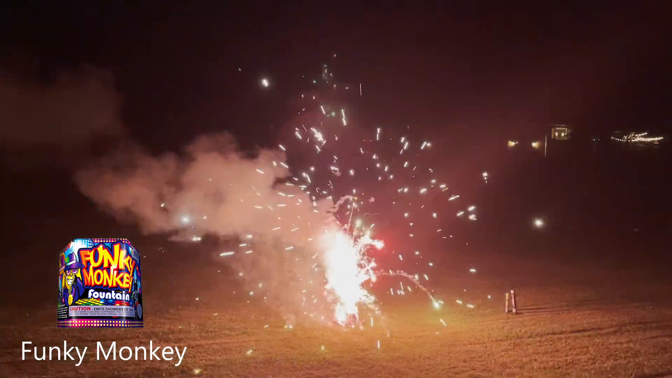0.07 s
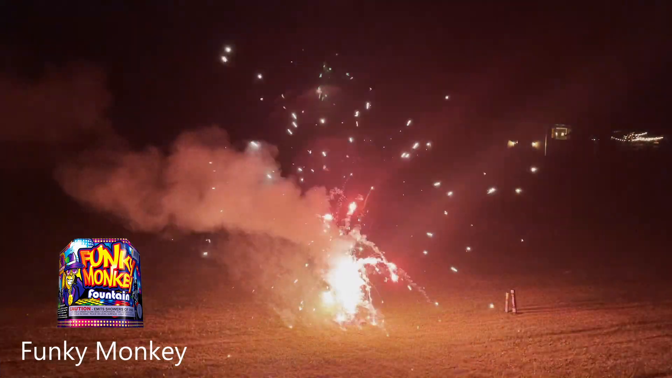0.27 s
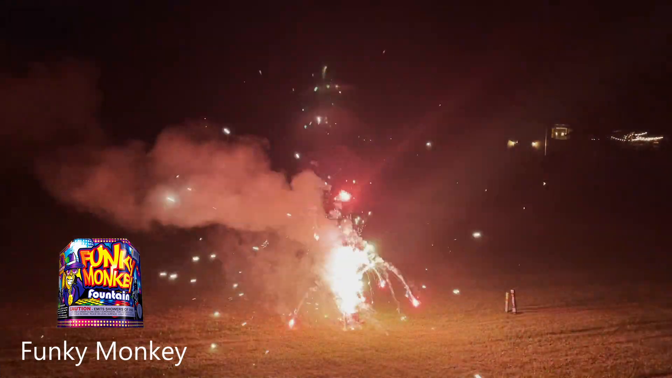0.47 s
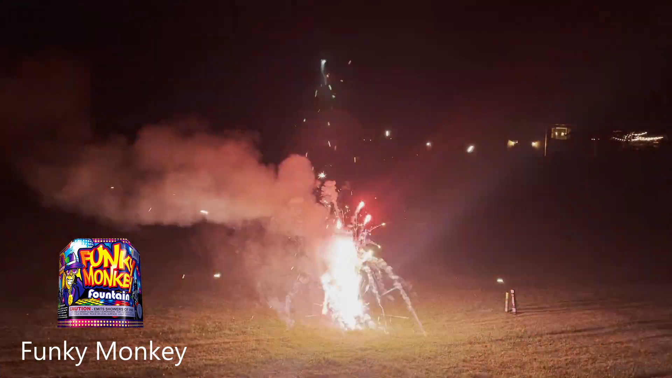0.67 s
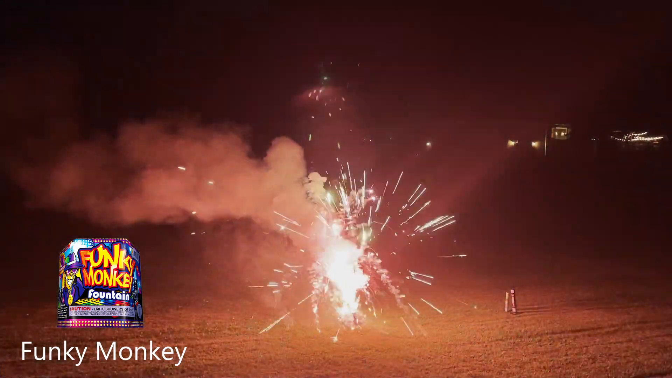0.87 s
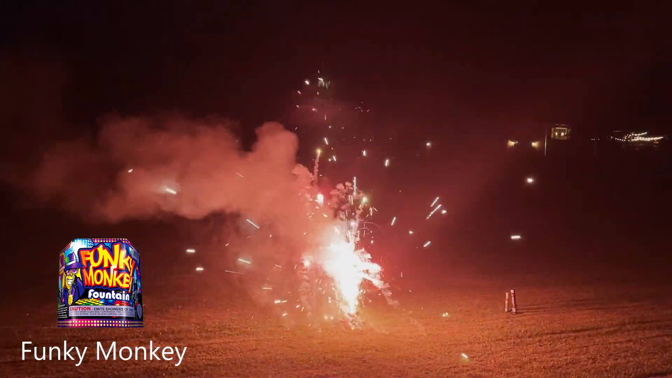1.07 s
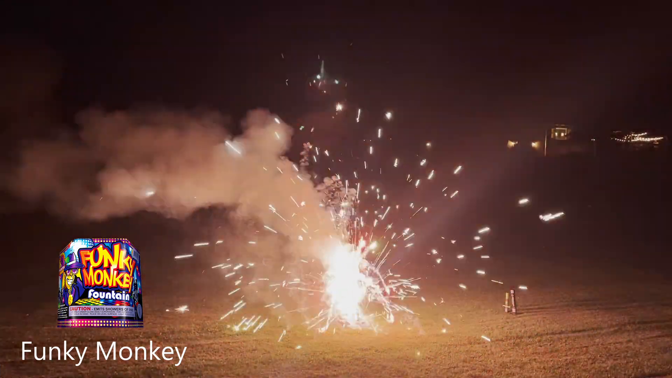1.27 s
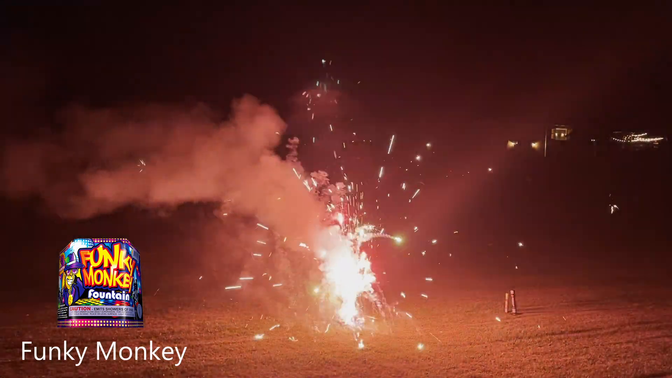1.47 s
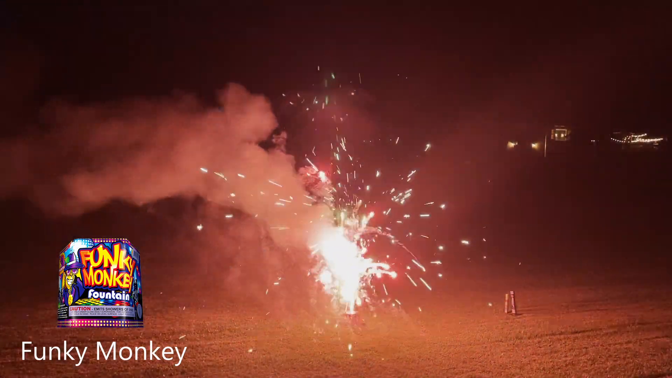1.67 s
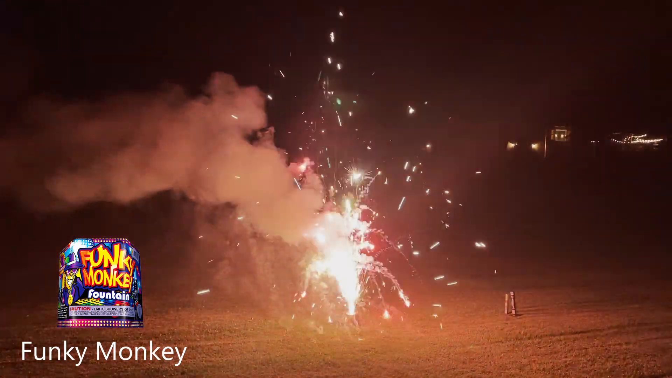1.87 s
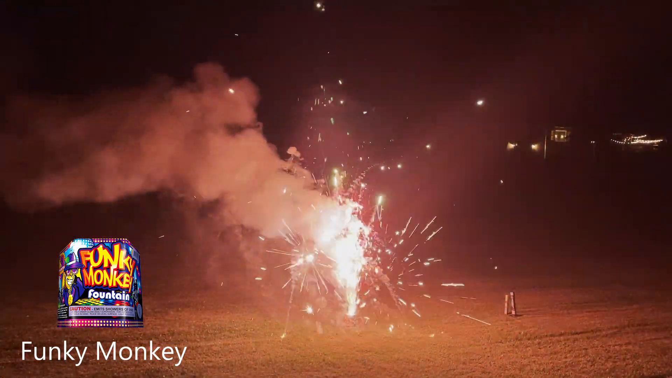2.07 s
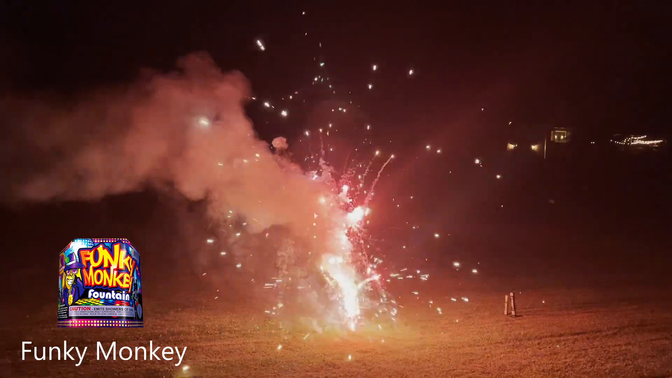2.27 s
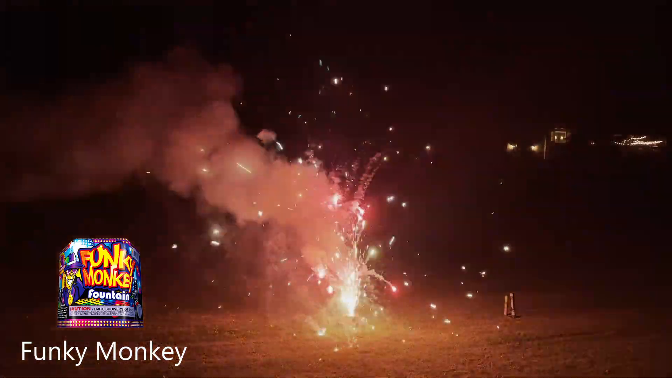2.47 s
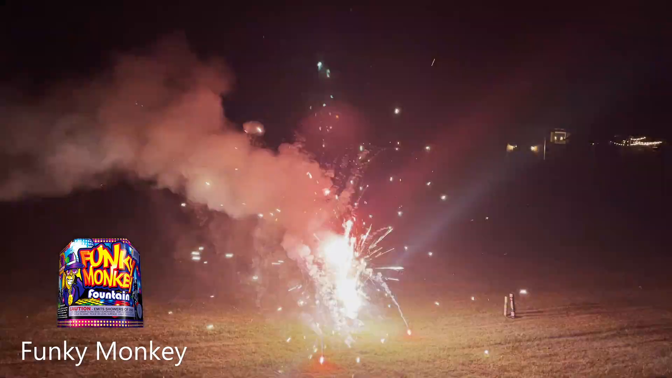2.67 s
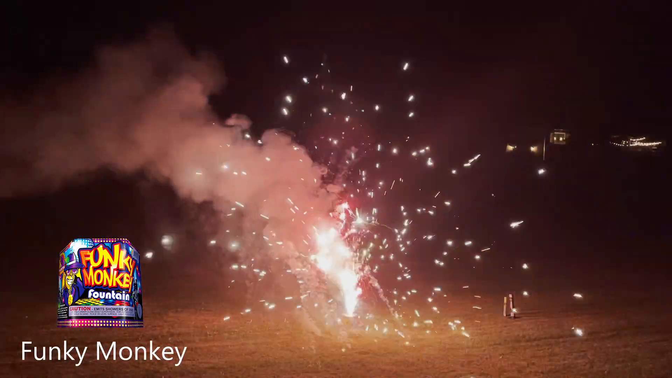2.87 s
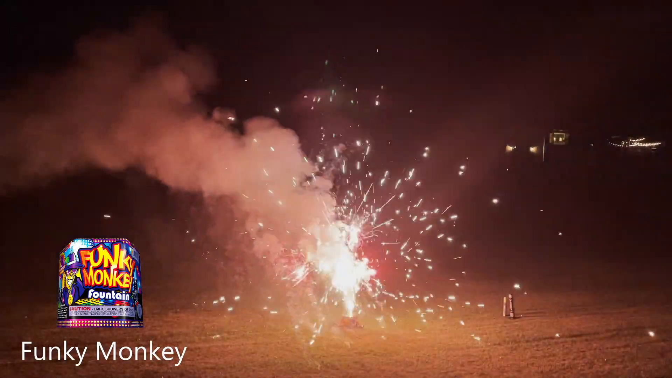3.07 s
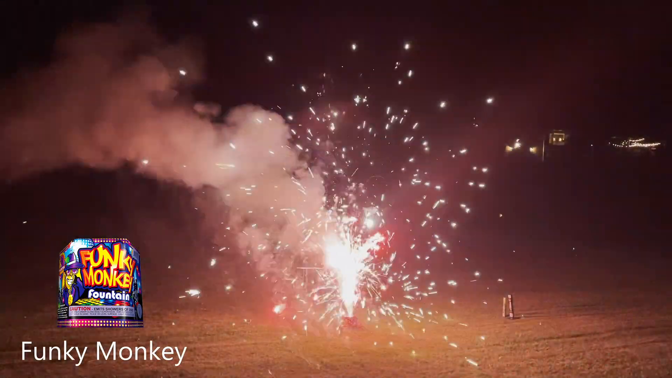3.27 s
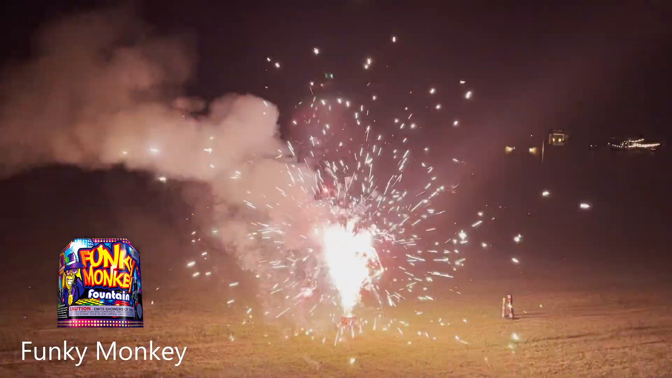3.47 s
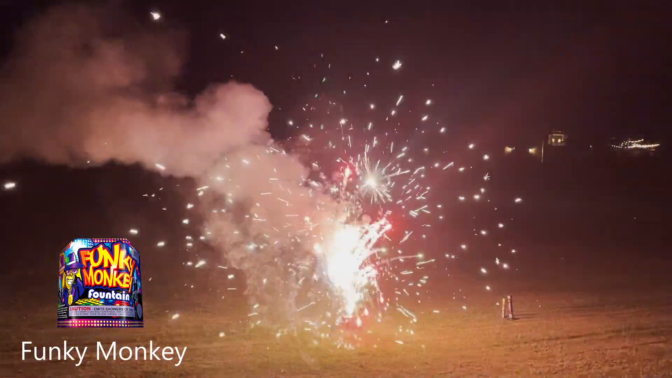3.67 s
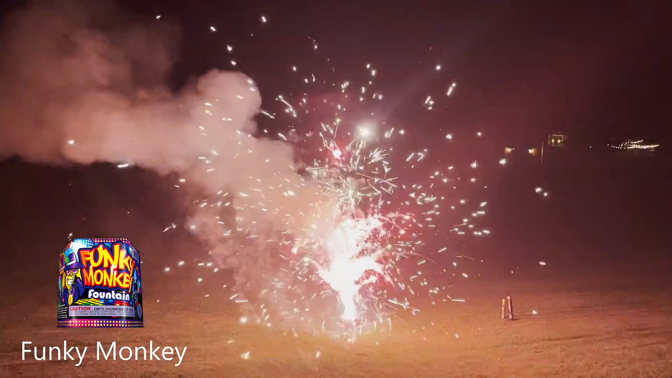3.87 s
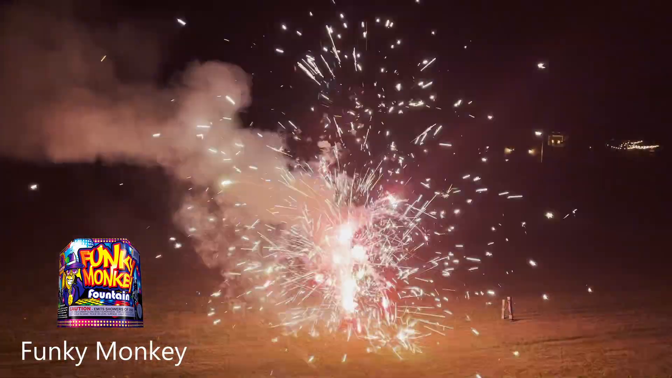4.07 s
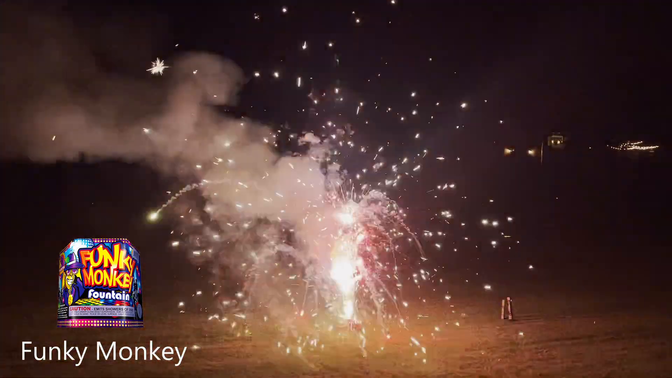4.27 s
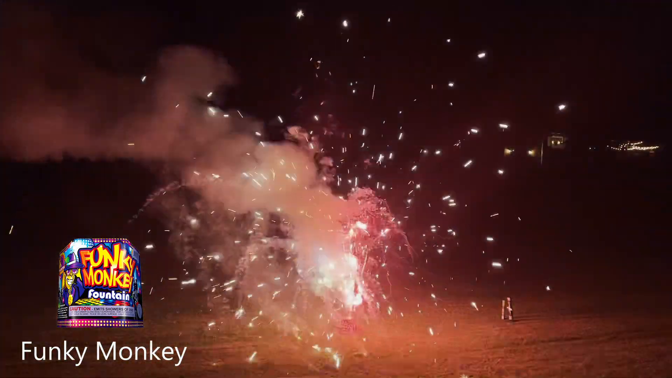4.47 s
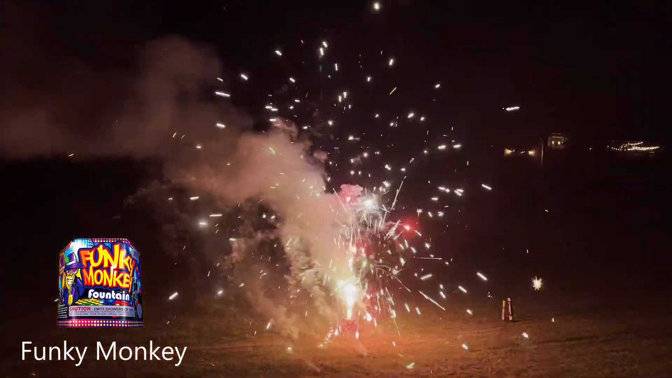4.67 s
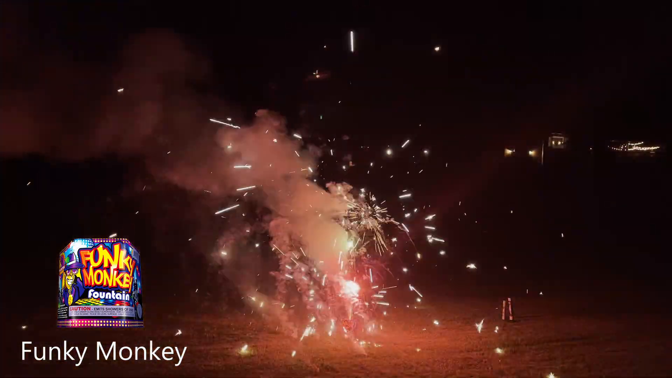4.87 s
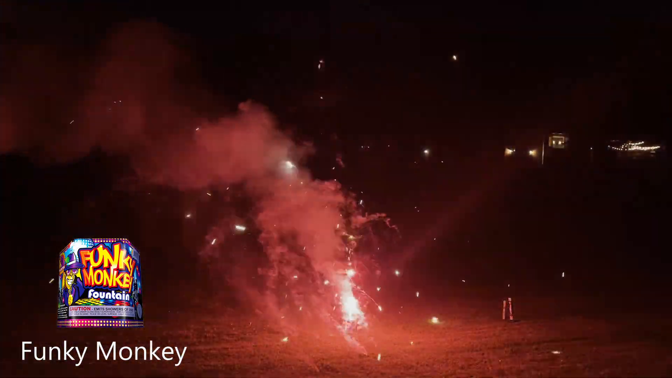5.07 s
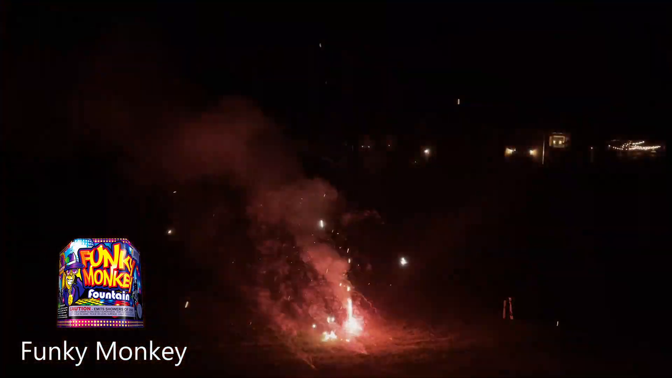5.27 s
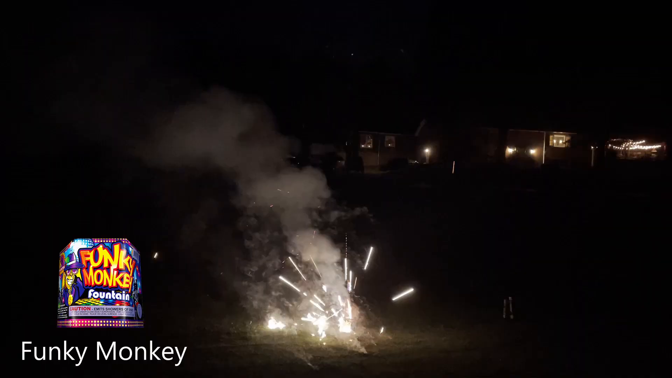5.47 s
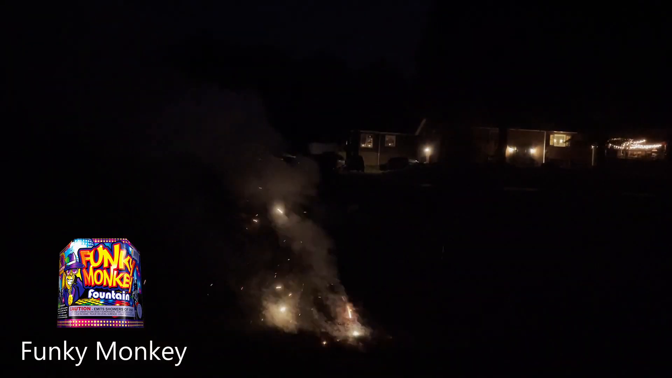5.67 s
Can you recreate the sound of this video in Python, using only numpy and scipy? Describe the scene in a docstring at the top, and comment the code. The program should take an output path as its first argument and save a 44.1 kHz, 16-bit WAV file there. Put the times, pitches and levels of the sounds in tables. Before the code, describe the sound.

A ground firework crackles outdoors at night in dense sharp pops and snaps over a sputtering hiss, peaks, thins, and ends with two isolated pops.

```python
"""A lawn at night, with a ground fountain firework burning some metres from a small stereo microphone.
Pellets burst in clusters, thickest around four seconds: each is a shock, a ground bounce and a short spray.
Sparks snap after them as single clicks; the jet behind is noise, a sputtering hiss over a low flutter.
The jet dies, the last pellets pop, and sparse decaying noise brings a faint echo from the houses around."""
import sys
import numpy as np
from scipy import signal
from scipy.fft import rfft, irfft
from scipy.io import wavfile

SR = 44100
rng = np.random.default_rng(int(sys.argv[2]) if len(sys.argv) > 2 else 0)


def waveform_to_disk(signal):
    """Save audio, clipped to [-1, 1], as 16-bit WAV at the path in sys.argv[1]."""
    frames = np.transpose(np.atleast_2d(signal))
    scaled = np.clip(frames, -1, 1) * 32767
    samples = np.round(scaled).astype(np.int16)
    wavfile.write(sys.argv[1], SR, samples)


N = 252384

# clusters of pellets, each pellet setting off the next; a length of 0 is a lone pellet:
# [start t/s, length/s, nominal level of the first burst/dB, its thump below 500 Hz/dB]
CLUSTERS = [(0.0184, 0.002, -19, -35), (0.0359, 0.0, -19.5, -26.5), (0.0523, 0.006, -20.5, -33),
            (0.0908, 0.00046, -20.5, -50.5), (0.098, 0.0003, -26.0, -31.5), (0.1018, 0.00047, -20, -28.5),
            (0.1844, 0.01, -20.5, -43), (0.2529, 0.0, -18.5, -34.0), (0.292, 0.0003, -21.5, -39),
            (0.3261, 0.0, -26, -48), (0.4272, 0.00013, -17.5, -46), (0.4511, 0.008, -21, -29),
            (0.4744, 0.00043, -22, -36), (0.5821, 0.0, -32.5, -37.0), (0.5959, 0.0, -19.5, -37.5),
            (0.7019, 0.00038, -34, -45), (0.7174, 0.00056, -24.5, -37), (0.7511, 0.012, -19.5, -27.0),
            (0.8331, 0.00044, -36, -46), (0.9245, 0.00016, -19.5, -28.5), (0.9693, 0.000072, -39.5, -43.0),
            (0.985, 0.0, -20.5, -30), (1.04, 0.00054, -19.5, -34.5), (1.055, 0.000074, -26.5, -37.5),
            (1.0597, 0.0, -20.0, -37), (1.0981, 0.0, -20.0, -31), (1.164, 0.002, -24, -40.5),
            (1.1701, 0.0019, -19, -27.5), (1.1976, 0.0, -22, -38.5), (1.2272, 0.0015, -18.5, -30),
            (1.2319, 0.037, -21.0, -27.5), (1.295, 0.01, -19.5, -26.5), (1.3498, 0.007, -19.5, -25.5),
            (1.4064, 0.0, -21.5, -30), (1.474, 0.0, -23, -47), (1.4985, 0.00054, -21, -36.0),
            (1.5611, 0.0052, -25, -31.5), (1.5958, 0.029, -21, -30), (1.6398, 0.0, -25, -47),
            (1.7016, 0.0016, -26.5, -40.5), (1.7167, 0.0026, -20, -36.5), (1.8, 0.013, -21, -34.0),
            (1.8486, 0.00022, -32.0, -36.5), (1.8847, 0.0, -17.5, -40.5), (1.9054, 0.0032, -20.0, -35.5),
            (1.9631, 0.01, -24, -34), (1.988, 0.0, -20.5, -33.0), (2.0314, 0.0044, -28.5, -41.5),
            (2.0754, 0.0, -31, -44.5), (2.122, 0.007, -20.5, -37.5), (2.1514, 0.032, -21.5, -33.5),
            (2.2102, 0.00095, -24.5, -38.0), (2.2493, 0.00032, -24.5, -39.0), (2.2598, 0.005, -19.5, -24.0),
            (2.309, 0.00054, -27.5, -44.5), (2.3585, 0.000088, -20.5, -34.0), (2.3767, 0.0015, -20.5, -36),
            (2.4062, 0.00029, -23.0, -54.5), (2.4261, 0.00025, -22.5, -49), (2.4437, 0.012, -26, -55),
            (2.4778, 0.0029, -25.5, -45.5), (2.4835, 0.0011, -23, -44.5), (2.5233, 0.006, -21, -33.5),
            (2.5918, 0.007, -16.5, -26.0), (2.6132, 0.0, -22.0, -36.0), (2.6558, 0.0018, -25.5, -45),
            (2.6684, 0.009, -21, -25), (2.7263, 0.00027, -31, -52.5), (2.7501, 0.0037, -24.5, -43.5),
            (2.7613, 0.008, -20.0, -28), (2.786, 0.00054, -27, -49.0), (2.8024, 0.004, -18, -30),
            (2.8173, 0.037, -18, -28.5), (2.8734, 0.0, -19.5, -31.5), (2.8919, 0.013, -21, -33.5),
            (2.956, 0.007, -27, -49), (2.9909, 0.004, -24, -40.5), (2.9987, 0.0014, -18.5, -31.5),
            (3.017, 0.0021, -25, -54.5), (3.042, 0.00071, -24.5, -47), (3.0783, 0.0, -16.5, -29.0),
            (3.1, 0.017, -21.5, -38.0), (3.1498, 0.000067, -20, -35.5), (3.1813, 0.01, -22.5, -29.0),
            (3.2166, 0.015, -21.0, -34.5), (3.2695, 0.0023, -23.0, -38.5), (3.2945, 0.006, -18, -30),
            (3.3269, 0.0062, -26.0, -43.5), (3.3495, 0.02, -23.5, -44), (3.3806, 0.03, -21.0, -26),
            (3.4255, 0.04, -20, -34.5), (3.4788, 0.043, -22, -31), (3.5287, 0.007, -19, -35),
            (3.5621, 0.044, -20.5, -35), (3.6117, 0.0011, -24.5, -33.5), (3.6173, 0.007, -16, -27.5),
            (3.6503, 0.021, -21.0, -31.5), (3.6996, 0.013, -29.5, -40), (3.7219, 0.0055, -17.5, -30.0),
            (3.755, 0.00053, -26.5, -45.5), (3.7663, 0.004, -21, -36), (3.7993, 0.01, -18.5, -35.5),
            (3.832, 0.015, -24.0, -37), (3.8669, 0.019, -18.5, -33), (3.903, 0.015, -20, -36.5),
            (3.9465, 0.042, -20, -25), (4.0042, 0.009, -18.0, -25), (4.0292, 0.02, -22.0, -36.5),
            (4.0845, 0.014, -20, -27), (4.1221, 0.01, -17, -33), (4.1452, 0.0012, -18, -25),
            (4.16, 0.00027, -32, -53), (4.1653, 0.0, -24, -45), (4.1928, 0.033, -20.5, -31.5),
            (4.247, 0.045, -21.5, -32), (4.3043, 0.00096, -25, -36), (4.3571, 0.004, -21.5, -38.5),
            (4.3825, 0.0019, -26.0, -41), (4.4048, 0.0011, -19.5, -46), (4.4262, 0.016, -21.5, -31.5),
            (4.4583, 0.005, -22, -42), (4.5082, 0.0021, -30.5, -47.0), (4.5438, 0.001, -31.0, -36),
            (4.5665, 0.0, -27, -49), (4.5854, 0.0, -21.0, -27.5), (4.6106, 0.01, -21.0, -32.5),
            (4.6364, 0.008, -20.5, -31.5), (4.6593, 0.0027, -23, -36), (4.7352, 0.000072, -24.0, -41.0),
            (4.7555, 0.00085, -27.5, -45), (4.7802, 0.00022, -22.0, -37), (4.8009, 0.0, -26, -45.0),
            (4.8286, 0.008, -21.5, -33.5), (4.8801, 0.0011, -33.5, -46), (4.9037, 0.0052, -22, -33.5),
            (4.9823, 0.0016, -40.5, -51), (5.0174, 0.0, -24.5, -43.5), (5.2621, 0.0, -22.0, -34.5),
            (5.5081, 0.0, -22, -29.5), (5.5483, 0.0, -39.5, -60)]
# course of the burning jet, before the trims in jet(): [t/s, hiss level/dB, flutter level/dB]
JET_COURSE = [(0, -49.5, -55.5), (0.35, -58.5, -54.5), (0.7, -60.0, -55), (1.1, -58.5, -61.5),
              (1.3, -49, -52), (1.5, -56.0, -54.5), (2.05, -56, -46.5), (2.55, -60.5, -54.5),
              (2.85, -55.5, -51.5), (3.25, -48.0, -55), (3.45, -41.5, -48), (4.15, -41, -48),
              (4.45, -56.0, -66), (4.7, -57, -53), (5.1, -67.5, -74.0), (5.72, -77, -99)]

POP_SIZE = 4096  # samples in one burst or snap
EDGE_HZ = 16450  # upper band limit
# share of a burst's nominal level in the crack above 3 kHz and in the body at 0.5-3 kHz
CRACK_DB, BODY_DB = -1.5, -5


def gain_of(db):
    """Decibels to gain."""
    return 10 ** (np.asarray(db) / 20)


def evened(x):
    """Scales to rms 1."""
    return x / np.sqrt(np.mean(x ** 2) + 1e-20)


def read(points, hz, column=1):
    """Reads a spectrum table on a log-frequency axis."""
    points = np.asarray(points, float)
    return np.interp(np.log(hz + 1), np.log(points[:, 0] + 1), points[:, column])


def add(mix, s, sound):
    """Mixes a stereo sound in at time s, cut off at the ends of the mix."""
    start = round(s * SR)
    sound = sound[:, max(-start, 0):]
    part = mix[:, max(start, 0):][:, :sound.shape[1]]
    part += sound[:, :part.shape[1]]


def wander(rate_hz):
    """A random curve of rms 1 that moves mostly below the given rate."""
    hz = np.fft.rfftfreq(N, 1 / SR)
    slowed = rfft(rng.standard_normal(N)) / (1 + (hz / rate_hz) ** 4)
    return evened(irfft(slowed, N))


def chains(count=10):
    """Every cluster runs off as an uneven chain of bursts: rows of (t/s, crack/dB, body/dB, thump/dB)."""
    # the harder the jet burns, the faster a cluster runs off: [hiss level/dB, gap between bursts/s]
    pace = [(-55, .0082), (-42, .0056)]
    gap_spread, bright_spread_db = .35, 0.9  # uneven gaps; some bursts brighter, some duller
    # later bursts are a little weaker than the first and have far less thump
    next_db, next_spread_db = -2.5, 1.86
    next_thump_db, thump_spread_db = -7, 2.5
    when, hiss_db, _ = np.transpose(JET_COURSE)
    rows = []
    chances = rng.standard_normal((len(CLUSTERS), 4, count))
    for (start, length, level, thump), chance in zip(CLUSTERS, chances):
        gap_s = np.interp(np.interp(start, when, hiss_db), *np.transpose(pace))
        bursts = int(np.clip(1 + round(length / gap_s), 1, count))
        gap, size, weight, bright = np.clip(chance[:, :bursts], -2, 2)
        later = np.arange(bursts) > 0
        steps = np.cumsum(later * np.exp(gap_spread * gap))
        times = start + length * steps / (steps[-1] or 1)  # the last of several falls at the cluster's end
        levels = level + later * (next_db + next_spread_db * size)
        thumps = thump + later * (next_thump_db + thump_spread_db * weight)
        tilt = bright_spread_db * bright
        rows += zip(times, levels + CRACK_DB + tilt, levels + BODY_DB - tilt, thumps)
    return np.array(rows)


def stragglers(until_s=4.95, share=.45, late_s=.022, late_db=-13.5, late_thump_db=-17):
    """Weak late pellets behind some clusters begun before until_s, in rows like those of chains()."""
    start, length, level, thump = np.transpose(CLUSTERS)
    draw, wait = rng.random((len(CLUSTERS), 2)).T
    when = start + length + late_s * np.sqrt(wait)
    weak = level + late_db
    rows = np.transpose([when, weak + CRACK_DB, weak + BODY_DB, thump + late_thump_db])
    return rows[(draw < share) & (start < until_s)]


def pops(pellets, lag_cycles=1.15, sweep_s=0.00033, body_hz=500, crack_hz=3000, bounce=.5,
         bounce_s=0.001093, spray_s=.0013, scatter_db=4.0, grass_hz=9000, apart=0.56,
         deepen=0.32, depth_hz=35):
    """Each pellet is one sharp shock, its bounce off the ground, and a short spray of scattered sound."""
    # spectrum that lifts the pellets' low end: [f/Hz, level/dB per Hz]
    thump_spectrum = [(20, -16), (40, 5.5), (65, 11), (110, 9), (220, 5), (350, 2.5), (600, -7)]
    hz, t = np.fft.rfftfreq(POP_SIZE, 1 / SR), np.arange(POP_SIZE) / SR
    lead_in = 128 / SR  # room ahead of the shock, s
    span = .002 * SR  # levels are rms over two milliseconds, here in samples
    # low notes arrive last, so every thump is a quick falling chirp
    turns = lag_cycles * np.log(hz + 1) + sweep_s * hz * (1 - hz / EDGE_HZ) / 2 + hz * lead_in
    response = ports(hz) * np.exp(-2j * np.pi * turns) * gain_of(read(thump_spectrum, hz))
    response /= 1 + (hz / EDGE_HZ) ** 60
    below_body = 1 / (1 + (hz / body_hz) ** 8)
    below_crack = 1 / (1 + (hz / crack_hz) ** 8)
    bands = np.array([below_body, below_crack - below_body, 1 - below_crack])
    # grass swallows the treble of the bounce and the spray; long waves are not scattered
    grass = hz / (hz + body_hz) / (1 + 1j * hz / grass_hz)
    out = np.zeros((2, N))
    for s, crack, body, thump in pellets:
        # the higher the pellet, the later its bounce: each burst gets a colour of its own
        height = rng.random() ** 2
        shock = 1 + bounce * grass * np.exp(-2j * np.pi * hz * bounce_s * height)
        shared, *own = rng.standard_normal((3, POP_SIZE)) * np.exp(-t / spray_s)
        spray = shared + apart * np.array(own)
        spray = gain_of(scatter_db) * grass * rfft(spray / np.linalg.norm(spray[0]))
        # a bigger charge reaches deeper
        depth = hz / np.hypot(hz, depth_hz * gain_of(-deepen * (thump + 33.0)))
        burst = response * depth * (shock + spray)
        rms = np.sqrt((bands ** 2 * (abs(burst) ** 2).mean(0)).mean(1) / span)
        weights = gain_of([thump, body, crack]) / rms
        add(out, s - lead_in, irfft(burst * (weights @ bands)))
    return out


def sparks(pellets, per_pop=3.2, cluster_s=.02, spread_db=5, level_db=10, follow=0.9, thin_hz=1200):
    """Small fragments snap just after the pellets, louder when the jet burns strongly."""
    when, hiss_db, _ = np.transpose(JET_COURSE)
    samples = np.clip(pellets[:, 0] * SR, 0, N - 1).astype(int)
    bursts = np.bincount(samples, minlength=N)
    # the chance of a snap jumps at each burst and dies away over cluster_s
    keep = np.exp(-1 / (cluster_s * SR))
    chance = per_pop * signal.lfilter([1 - keep], [1, -keep], bursts)
    spread = spread_db * np.minimum(rng.exponential(1, N), 3)
    size = gain_of(spread + follow * np.interp(np.arange(N) / SR, when, hiss_db))
    clicks = size * (rng.random(N) < chance)
    hz = np.fft.rfftfreq(POP_SIZE, 1 / SR)
    snap = np.roll(irfft(ports(hz) * hz / (hz + thin_hz)), 64, axis=1)
    snap = snap / np.linalg.norm(snap[0])
    return gain_of(level_db) * signal.oaconvolve(clicks[None], snap, axes=1)[:, :N]


def jet(hiss_db=-2, flutter_db=-4, sputter_db=2, gust_db=4.5, hiss_apart=0.92, flutter_apart=.15):
    """Gas rushes from the tube: a sputtering hiss above a low, lumpy flutter, both shaped noise."""
    # spectra of the hiss and of the flutter: [f/Hz, level/dB per Hz]
    hiss_spectrum = [(100, -8), (450, 1), (900, 3.5), (2200, 6.5), (3500, 0), (6000, -1.5), (8000, -7),
                     (10500, -8.5), (16000, -11.5)]
    flutter_spectrum = [(20, -27), (55, 6), (100, 0.5), (300, -4), (450, -15.5), (800, -45), (2000, -79)]
    when, *levels = np.transpose(JET_COURSE)
    hiss_level, flutter_level = (np.interp(np.arange(N) / SR, when, level) for level in levels)
    hz = np.fft.rfftfreq(N, 1 / SR)
    # noise common to both sides, and some of each side's own for width
    shared, *own = rfft(rng.standard_normal((3, N)))
    wide = shared + hiss_apart * np.array(own)
    narrow = shared + flutter_apart * np.array(own)
    hiss = evened(irfft(wide * port_phase(hz) * gain_of(read(hiss_spectrum, hz)), N))
    flutter = evened(irfft(narrow * gain_of(read(flutter_spectrum, hz)), N))
    sputter = sputter_db * wander(rate_hz=49)
    gusts = gust_db * wander(rate_hz=2.7)
    return (hiss * gain_of(hiss_db + hiss_level + sputter)
            + flutter * gain_of(flutter_db + flutter_level + gusts))


def surroundings(x, near_db=-18, near_s=0.005, far_db=-35, dull_hz=12000):
    """Each burst has a brief, soft, noisy tail; distant houses and trees return a long, faint wash."""
    # echo of the neighbourhood: [f/Hz, time to fall by 60 dB/s]
    echo_t60 = [(100, 2.7), (1000, 0.57), (4000, 0.43), (9000, 0.23), (16000, 1)]
    t = np.arange(2 * SR) / SR
    shared, *own = rng.standard_normal((3, len(t)))
    # about 3000 taps a second, at random times
    taps = (shared + 0.48 * np.array(own)) * (rng.random(len(t)) < 3000 / SR)
    hz, at, z = signal.stft(taps, SR, nperseg=256)
    z = z / np.hypot(1, hz / dull_hz)[:, None]
    near = signal.istft(z * np.exp(-at / near_s), SR, nperseg=256)[1]
    fall_db = -60 * at / read(echo_t60, hz)[:, None]
    far = signal.istft(z * gain_of(fall_db), SR, nperseg=256)[1]
    near = gain_of(near_db) * near / np.linalg.norm(near[0])
    far = gain_of(far_db) * far / np.linalg.norm(far[0])
    return signal.fftconvolve(x, near + far, axes=1)[:, :N]


def ports(hz):
    """Causal response of the left and right microphone ports: minimum phase, then the port phase."""
    # colour of a burst at the microphone: [f/Hz, left level/dB, right level/dB]
    colour = [(470, -10, -10), (844, -0.5, -1.5), (1165, -3.5, -11), (1530, -2, -1), (1850, -4.5, -15.5),
              (2062, -1.5, 3), (2951, -6, -9), (3140, -12.5, -7.5), (3850, -11, -18.5), (4640, -6, -9),
              (6730, -7.5, -5.5), (7010, -10.5, -15.5), (7730, -8, -9.5), (9420, -6, -5.5),
              (13100, -15, -15.5), (15300, -7.5, -8)]
    gain = gain_of([read(colour, hz, column=side) for side in (1, 2)])
    log_gain = np.log(gain).mean(0)
    # minimum phase from the mean of both sides
    phase = -signal.hilbert(np.r_[log_gain, log_gain[-2:0:-1]]).imag[:len(hz)]
    return gain * np.exp(1j * phase) * port_phase(hz)


def port_phase(hz):
    """Above some 6 kHz the right port leads the left in phase; below, it mostly lags a little."""
    # phase between the two microphone ports: [f/Hz, lead of the right/radians]
    right_lead = [(0, 0.0), (950, -0.7), (2050, 0.3), (2950, -1.4), (4100, -0.2), (5300, -0.4), (7000, 0.5),
                  (7500, 2.5), (15000, 9.5)]
    return np.exp(1j * np.outer([-.5, .5], np.interp(hz, *np.transpose(right_lead))))


def scene():
    """Pellets, sparks and jet in the open air; only the crackle gets a tail and an echo."""
    gas = jet()
    pellets = np.vstack([chains(), stragglers()])
    crackle = sparks(pellets) + pops(pellets)
    return crackle + surroundings(crackle) + gas


def record(dry):
    """The sharpest peaks are rounded off by overload; then the band limit."""
    rounded = dry / (1 + (dry / .41) ** 4) ** (1 / 4)  # stays below 0.41 of full scale
    lowpass = signal.firwin(255, EDGE_HZ, window=("kaiser", 8), fs=SR)
    return signal.oaconvolve(rounded, lowpass[None], "same")


dry = scene()
out = record(dry)
waveform_to_disk(out)
```